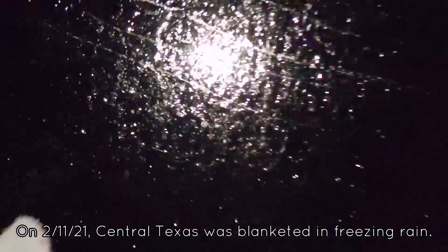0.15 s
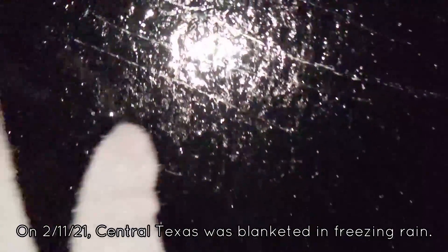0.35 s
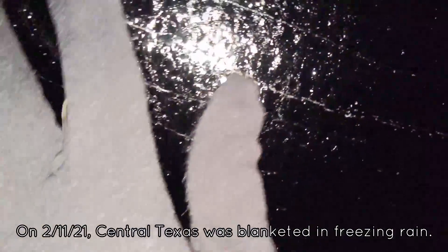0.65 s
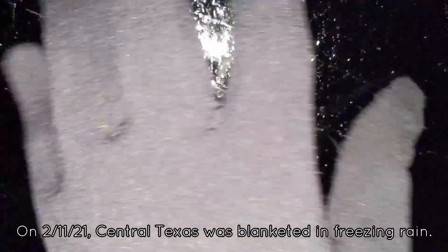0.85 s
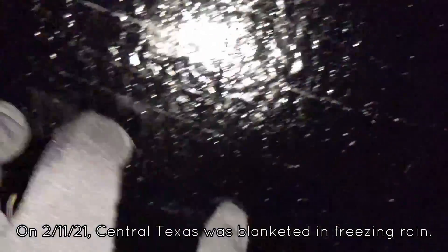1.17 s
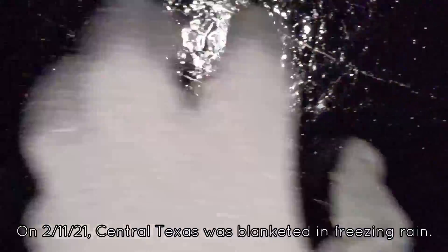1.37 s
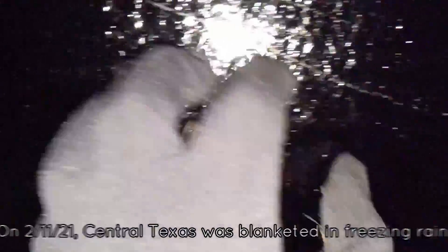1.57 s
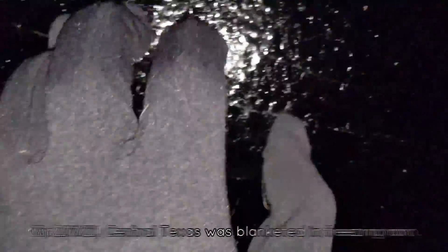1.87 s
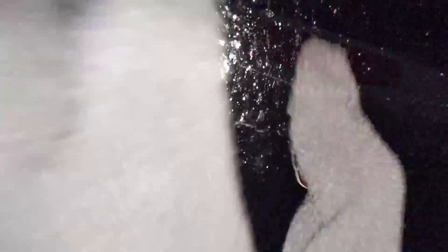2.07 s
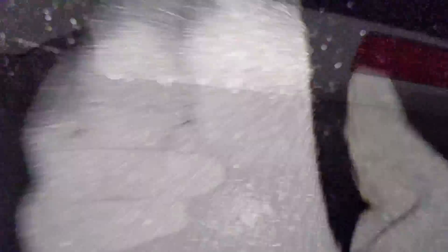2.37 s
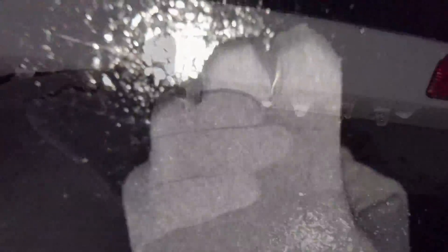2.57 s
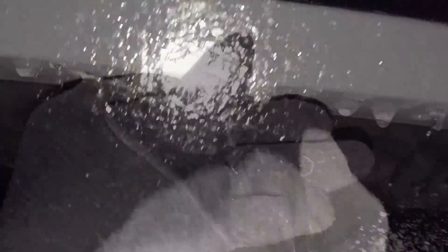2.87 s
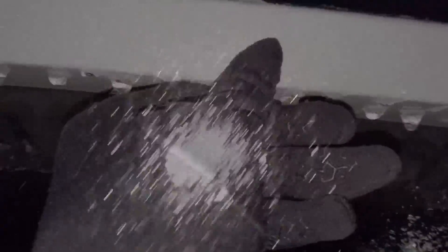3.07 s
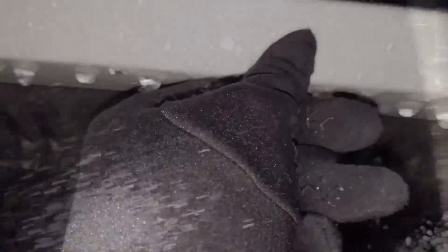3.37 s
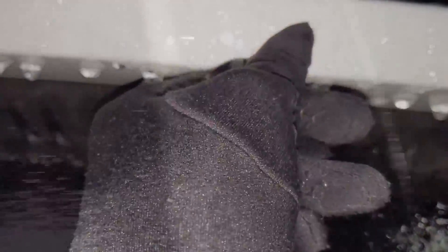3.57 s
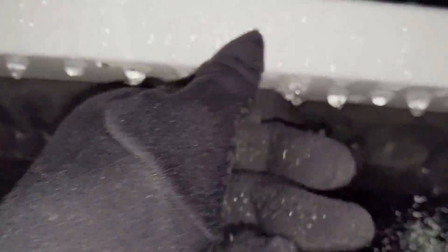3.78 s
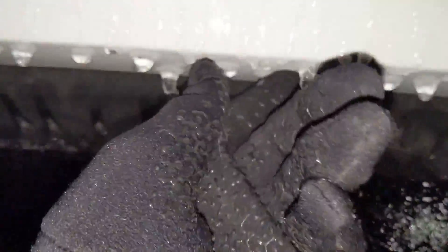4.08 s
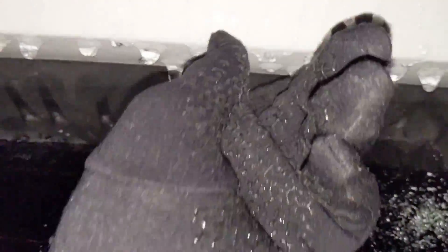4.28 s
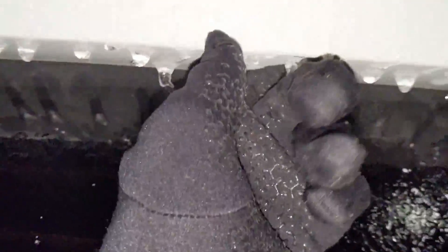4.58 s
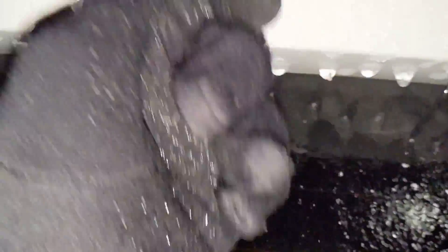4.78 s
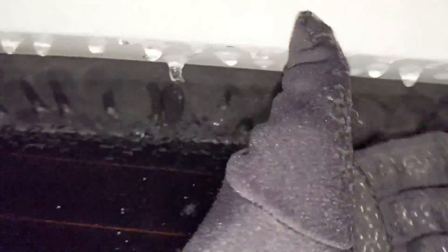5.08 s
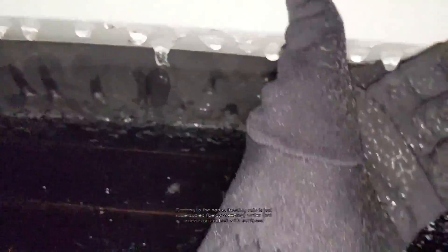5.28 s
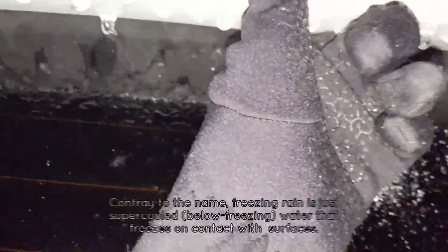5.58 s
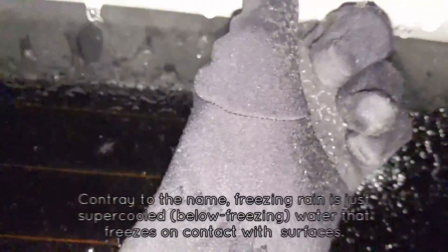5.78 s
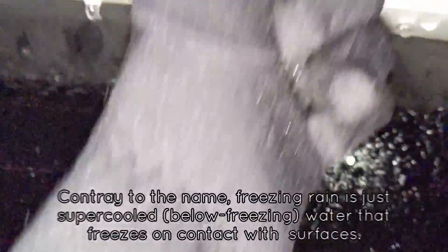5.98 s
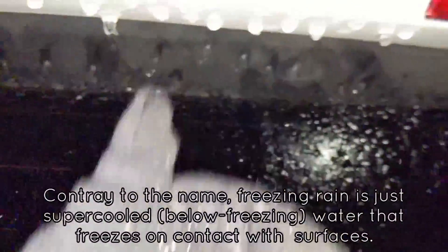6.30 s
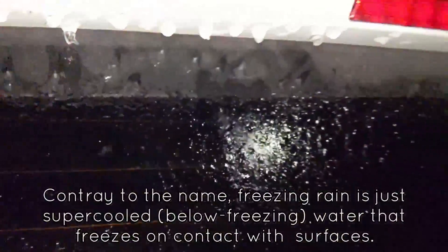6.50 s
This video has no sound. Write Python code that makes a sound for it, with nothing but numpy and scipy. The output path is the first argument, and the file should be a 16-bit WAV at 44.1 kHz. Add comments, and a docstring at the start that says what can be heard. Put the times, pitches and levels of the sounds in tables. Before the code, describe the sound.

Outdoors at night, close to a phone. Sleeve cloth rustles and the grip bumps softly, then a gloved hand slaps an icy car panel three times, each weaker, with a short hollow body ring. After a pause, icicles crack off the trim: two hard snaps a little over a second apart, smaller clicks around them, then a snap with a low thump. Ice crumbs tick, keys tinkle faintly, and distant traffic rumbles very quietly.

```python
"""Outdoors at night, close to a phone: a gloved hand slaps an ice-glazed car panel three times.
It then snaps small icicles off a trim edge. Slaps are short pushes of air that also ring the panel;
snaps are bursts of spiky noise, a pitched clack with bright splinters. The hand also thuds on the trim.
Ice crumbs tick and keys tinkle. Shaped noise makes the sleeve rustle, the soft bumps of the grip and
the rumble of distant traffic; a sine makes a faint hum."""
import sys
import numpy as np
from scipy import signal
from scipy.fft import rfft, irfft, next_fast_len
from scipy.io import wavfile
from scipy.ndimage import uniform_filter1d, map_coordinates

SR = 44100
rng = np.random.default_rng(int(sys.argv[2]) if len(sys.argv) > 2 else 0)


def log_audio(samples):
    """Write samples as a 16-bit WAV file to the path given in sys.argv[1]."""
    # one column per channel
    frames = np.atleast_2d(samples).T
    # limit to full scale, then quantise
    limited = np.clip(frames, -1, 1)
    pcm = np.round(limited * 32767).astype(np.int16)
    wavfile.write(sys.argv[1], SR, pcm)


N = 293000  # length in samples


def hand_blows():
    """A soft touch is a bell-shaped force: it pushes air once and rings the body, duller if it lasts longer."""
    out, lead = np.zeros((2, N)), 0.03  # lead: seconds kept before the middle of a touch
    t = np.arange(round(3 * lead * SR)) / SR - lead
    lean = amp([[-0.7], [0.7]])  # a little louder on the right
    for s, push_db, ms, ring_db, scuff_db, modes in slap_touches() + thud_touches():
        force = np.exp(-2 * (t * 1000 / ms) ** 2)
        ringing = ring(modes, scatter_db=1, attack=0.001)
        body = amp(ring_db) * signal.fftconvolve(ringing, force / force.sum())
        # air moves with the panel's speed: away, then back
        speed = -np.gradient(force)
        push = amp(push_db) * speed / speed.max()
        # the glove slides on after landing
        rub = filtered(rng.standard_normal((2, len(t))), scuff_tone)
        scuff = rub * np.exp(-(t / np.where(t < 0, 0.009, 0.028)) ** 2)
        # the glove lets little treble into the shell
        padded = filtered(push, lambda f: 1 / (1 + 1j * f / 500))
        add(out, s - lead, body * lean)
        add(out, s - lead, push * lean + amp(scuff_db) * scuff / np.abs(scuff).max())
        add(out, s - lead, amp(-4.5) * signal.fftconvolve(padded[None], shell(), axes=1))
    return filtered(out, lambda f: 1j * f / (95 + 1j * f))  # a small panel radiates deep bass poorly


def scuff_tone(f):
    """A sliding glove is strongest in the middle tones, weaker in the bass and the treble."""
    return f / (f + 400) * (0.013 + 1 / (1 + (f / 900) ** 1.8))


# parts of the hand: (push [dB re slap], contact time [ms], ring [dB re slap], scuff [dB re slap's scuff])
BRUSH, TIP, PALM, FINGERS = (-17, 1, -24.5, -1.5), (-8.5, 0.63, -20, -18), (-1, 2.5, -8, -4), (2, 0.67, -6.5, 0)
BRUSH_LEADS_S, TIP_LEADS_S = 0.005, 0.00049  # seconds before the palm
# slaps on the panel: (palm lands [s], push before the bass cut [dB], fingers follow after [s], scuff [dB])
SLAP_TIMES = [(1.9748, -9.5, 0.005, -40.5), (2.2516, -13, 0.0054, -40.5), (2.5374, -21, .0124, -36)]
# tones of the glazed panel: (pitch [Hz], level [dB], time to fall 60 dB [s])
PANEL_TONES = [(100.8, 2, 0.21), (130.1, -12, 0.49), (162.8, -7, 0.095), (236.6, -14, 0.25),
               (395, -19.5, 0.27), (423, -33, 0.21), (550, -15.5, 0.23), (750, -27, 0.11), (851, -43, 0.26),
               (900, -35, 0.21), (1058, 22.5, 0.012)]


def slap_touches():
    """A slap is four touches: a brush and a fingertip just before the palm, then the fingers."""
    touches = []
    for s, db, follow, scuff_db in SLAP_TIMES:
        parts = [(-BRUSH_LEADS_S, BRUSH), (-TIP_LEADS_S, TIP), (0, PALM), (follow, FINGERS)]
        for wait, (push, ms, ring_db, scuff) in parts:
            touches.append((s + wait, db + push, ms, db + ring_db, scuff_db + scuff, PANEL_TONES))
    return touches


THUD_S, THUD_DB, THUD_MS, THUD_RING_DB = 5.9572, -9, 2.1, -11  # time, push, contact time, ring against push
SECOND_PUSH_S, SECOND_PUSH_DB = 0.00498, -6.5  # delay after the first push and level against it
# tones of the trim edge: (pitch [Hz], level [dB], time to fall 60 dB [s])
TRIM_TONES = [(189.2, -2, 0.18), (243.6, 0, 0.14), (315, -2.5, 0.13), (384.5, -1, 0.15), (467, -12.5, 0.24),
              (620, -7, 0.086), (841, -11.5, 0.14), (965, -7.5, 0.11), (1038, 0.5, 0.077),
              (1460, -20, 0.072), (1600, -21, 0.14), (1827, -11.5, 0.087), (2950, -31.5, 0.25),
              (3811, -22.5, 0.088)]


def thud_touches():
    """The heel of the hand hits the trim: a short low thump near 200 Hz made of two pushes, the second weaker."""
    pushes = [(THUD_S, THUD_DB), (THUD_S + SECOND_PUSH_S, THUD_DB + SECOND_PUSH_DB)]
    return [(s, db, THUD_MS, db + THUD_RING_DB, -np.inf, TRIM_TONES) for s, db in pushes]  # no scuff


SNAP_WIDTH_HZ = 1800  # width of the clack
SNAP_T60_S, T60_PER_DB_S = 0.026, 0.0002  # decay of the loudest snap, shorter for each dB less
# icicles break off: (time [s], clack [dB], pitch [Hz], splinters [dB], knock into the trim [dB],
# left minus right [dB])
ICICLE_SNAPS = [(3.5398, -14, 1050, -20.5, -31, 0.5), (3.989, -30.5, 1400, -44, -82, 0),
                (4.058, -40, 2210, -51, -65, 0), (4.121, -48, 1550, -38, -63, -3.5),
                (4.278, -31, 2320, -23.5, -62.5, -1.5), (4.451, -45, 1900, -40, -54, -7),
                (4.721, -56.5, 1750, -51.5, -75, -2), (4.7538, -11.5, 1100, -23, -25, -1.5),
                (5.49, -33.5, 1850, -39, -53.5, -6), (5.502, -32, 1650, -37, -53, -6),
                (5.607, -30, 1340, -28.5, -41.5, -5), (5.94, -16.5, 850, -21, -28, -2),
                (6.269, -46, 1950, -49.5, -50.5, -11.5), (6.275, -48, 1550, -48, -83, -7)]


def icicle_snaps():
    """A breaking icicle cracks and knocks the trim, which rings in its own tones."""
    out = np.zeros((2, N))
    loudest_db = np.max(ICICLE_SNAPS, 0)[1]
    for s, db, hz, splinter_db, knock_db, pan in ICICLE_SNAPS:
        t60 = SNAP_T60_S - T60_PER_DB_S * (loudest_db - db)
        snap = crack(db, hz, SNAP_WIDTH_HZ / hz, splinter_db, t60, pan,
                     rise=0.0009, first=0.57, shell_db=-4.5)
        add(out, s, snap)
        knock = ring(TRIM_TONES, scatter_db=1.5, attack=0.003)
        # loud at first, then quickly damped by the glove still resting on the trim
        knock = knock * (1 + 1.45 * amp(-60 * np.arange(len(knock)) / SR / 0.099))
        add(out, s, amp(knock_db) * knock * amp([[-1.2], [1.2]]))
    return out


TICK_WIDTH_HZ, TICK_T60_S = 760, 0.0093  # width of the clack, time to fall 60 dB
# small ticks on the glaze: (time [s], clack [dB], pitch [Hz], splinters [dB], left minus right [dB])
CRUMB_TICKS = [(0.004, -34.5, 1290, -54.5, -4.5), (0.047, -44.5, 1760, -69, -9),
               (0.171, -48, 1770, -71, -4), (0.443, -46, 490, -70, -3), (0.848, -43, 1230, -44.5, -5),
               (1.75, -54, 3200, -56, -5), (1.774, -53, 1290, -74, -13), (1.837, -26.5, 2500, -37, -11.5),
               (1.8369, -32, 750, -70, -2.5), (2.103, -67, 600, -60, -23), (3.851, -34, 1520, -78, 3),
               (3.918, -32, 1160, -47, -1), (4.048, -53, 3880, -43, -4), (4.181, -52, 1210, -67, -2),
               (4.329, -41, 915, -65, -1), (4.593, -40, 840, -74, 3), (4.603, -47, 1390, -75, -10),
               (4.611, -38.5, 574, -76, -5), (4.62, -46, 1160, -76, 2), (4.639, -40.5, 840, -53, -2),
               (4.654, -62.5, 876, -48, -10), (4.851, -41.5, 950, -48, 7), (5.365, -50, 608, -67, 1),
               (5.445, -56, 659, -53, 2), (5.647, -54, 744, -48, -13), (5.683, -60, 1480, -62, -7),
               (5.696, -36, 1400, -36, -1.5), (5.718, -70, 1370, -51, 1), (5.77, -53.5, 1490, -52, -3),
               (5.917, -69.5, 2000, -53, 4.5), (6.033, -49.5, 680, -49.5, -2),
               (6.069, -47.5, 1860, -46.5, -12), (6.303, -42, 1460, -69, 3), (6.362, -34, 1750, -54, 7),
               (6.371, -45.5, 790, -51.5, -2), (6.538, -60, 888, -51.5, 3)]


def crumb_ticks():
    """Glove and ice crumbs tick on the glaze: short cracks with no knock into the trim."""
    out = np.zeros((2, N))
    for s, db, hz, splinter_db, pan in CRUMB_TICKS:
        tick = crack(db, hz, TICK_WIDTH_HZ / hz, splinter_db, TICK_T60_S, pan,
                     rise=0.00045, first=1.47, shell_db=-7.5)
        add(out, s, tick)
    return out


# colour of the splinters: (frequency [Hz], relative level [dB])
SPLINTER_COLOUR = [(880, -54), (1500, -0.5), (2500, -3), (4800, -4.5), (6170, -4.5), (8010, -8), (9690, -3),
                   (14800, -11.5), (15700, -32.5), (16500, -52)]
# level of a crack, left minus right: (frequency [Hz], difference [dB])
LEFT_LOUDER = [(60, 1), (110, -6.5), (200, 17.5), (380, 15), (700, -3.5), (1290, -5.5), (2380, -6),
               (4400, 12), (8120, 5.5), (15000, -3)]
# how far the left side of a crack leads: (frequency [Hz], phase [radians])
LEFT_LEADS = [(200, 4.1), (500, 0.252), (1000, 0.75), (2000, 1.35), (4000, 2.04), (16000, 1.82)]


def crack(db, hz, breadth, treble_db, t60, pan, rise, first, shell_db):
    """One sharp failure and a burst of micro-cracks: a clack and splinters, with the shell's answer."""
    t = np.arange(SR // 8) / SR
    sides = np.array([[1], [-1]])
    swell = amp(-60 * t / np.clip(t60, 0.002, 0.1)) * (1 - np.exp(-t / rise))
    spiky = rng.standard_normal((3, len(t))) * amp(2 * rng.standard_normal(len(t))) * swell
    spiky[:2, swell.argmax()] = -first * np.linalg.norm(swell)  # the sharp failure
    clack = filtered(spiky[0], lambda f: band(hz, breadth * hz)(f) * band(hz, 2.5 * breadth * hz)(f))
    bright = filtered(spiky[1] + 0.5 * spiky[2] * sides, lambda f: amp(along(SPLINTER_COLOUR, f)))
    burst = (amp(db) * unit(clack) + amp(treble_db) * unit(bright)) / unit(swell).max()

    def left_right(f):
        """Half of each level and phase difference goes to the left, the opposite half to the right."""
        return (amp(along(LEFT_LOUDER, f) / 2) * np.exp(0.5j * along(LEFT_LEADS, f))) ** sides

    burst = filtered(burst, left_right) * amp([[pan / 2], [-pan / 2]])
    answer = signal.fftconvolve(burst, shell(), axes=1)[:, :len(t) + SR // 4]
    return np.pad(burst, ((0, 0), (0, SR // 4))) + amp(shell_db) * answer


# touches of the keys: (time [s], level before the ringing filter [dB])
KEY_TOUCHES = [(2.8907, -46.5), (2.947, -52), (5.0499, -37.5), (5.0624, -40), (5.0823, -30), (5.094, -38),
               (5.1094, -44), (6.585, -44), (6.589, -37)]
# tones of the keys: (pitch [Hz], width [Hz], level [dB])
KEY_TONES = [(6190, 250, -8), (9100, 300, -13), (10400, 200, -5), (11930, 300, -3.5), (13100, 300, -12),
             (14500, 200, -2)]


def keys():
    """Small metal pieces chatter against each other and ring high: gritty noise through narrow bands."""
    chatter, t = np.zeros((2, N)), np.arange(SR // 10) / SR
    for s, db in KEY_TOUCHES:
        grit = rng.standard_normal((2, len(t))) * amp(1.8 * rng.standard_normal(len(t)))
        add(chatter, s, amp(db - 60 * t / 0.15) * (1 - np.exp(-t / 0.0015)) * grit)
    return filtered(chatter, lambda f: sum(amp(db) * band(hz, width)(f) for hz, width, db in KEY_TONES))


FLUTTER_DB, FLUTTER_PER_S = 1.5, 14  # size and speed of the random flutter
HISS_DB, HISS_GROWS = -4, 1.01  # the hiss against the rustle's body; it swings a little wider
# sleeve rustle: (time [s], level [dB])
SLEEVE_LEVEL = [(0.06, -63), (0.29, -58), (0.376, -51), (0.5, -61), (0.62, -66), (1.0, -62), (1.228, -55),
                (1.298, -60.5), (1.4, -54), (1.58, -57), (1.62, -65.5), (1.665, -57), (1.76, -67),
                (1.87, -61), (1.94, -70), (2.4, -72.5), (2.7, -70.5), (3.05, -67.5), (3.22, -64.5),
                (3.61, -71), (3.82, -70), (3.88, -59), (4.25, -66.5), (4.38, -63), (4.7, -70),
                (4.93, -63.5), (5.02, -68), (5.3, -62.5), (5.78, -74), (6.11, -65.5), (6.36, -63),
                (6.64, -65.5)]
# colour of the rustle's body: (frequency [Hz], relative level [dB])
CLOTH_COLOUR = [(240, -40.5), (400, -19.5), (467, -10.5), (566, -14), (785, -5), (1170, -1.5), (1660, 1.5),
                (2830, -7), (4000, -9), (5200, -40), (8800, -120)]
# colour of the rustle's hiss: (frequency [Hz], relative level [dB])
HISS_COLOUR = [(1470, -22.5), (2500, -11.5), (3320, -3.5), (4560, 6), (6150, 2.5), (7030, -2), (10600, 2),
               (15000, -2.5), (16100, -12), (16500, -35)]


def sleeve_rustle():
    """Rubbing cloth is noise in two ranges, a body and a hiss, that flutter together at random."""
    t = np.arange(N) / SR
    wobble = rng.standard_normal(round(t[-1] * FLUTTER_PER_S) + 4)
    flutter = map_coordinates(wobble, [t * FLUTTER_PER_S])  # smooth curve through the random points
    cloth_db = level_curve(SLEEVE_LEVEL) + FLUTTER_DB * flutter
    hiss_db = HISS_DB + cloth_db.mean() + HISS_GROWS * (cloth_db - cloth_db.mean())
    body = amp(cloth_db) * rush(CLOTH_COLOUR, patchy_db=1.4)
    hiss = amp(hiss_db) * rush(HISS_COLOUR, patchy_db=0.4)
    return (body + hiss) * amp([[-0.6], [0.6]])


BUMP_RISE_S, BUMP_FALL_S = 0.033, 0.045
# the grip on the phone shifts: (time [s], peak level [dB])
GRIP_SHIFTS = [(1.212, -38.5), (1.3, -46.5), (1.517, -39.5), (1.573, -45.5), (1.65, -50)]
# colour of the bumps: (frequency [Hz], relative level [dB])
BUMP_COLOUR = [(18, -45.5), (30, -25.5), (76, 0), (114, -0.5), (231, -14), (338, -27.5), (446, -24),
               (779, -27.5), (1000, -27), (1300, -39), (2200, -120)]


def grip_bumps():
    """The grip shifts in soft bumps: low noise that swells and fades along a bell shape."""
    t = np.arange(N) / SR
    swell = np.zeros(N)
    for s, db in GRIP_SHIFTS:
        swell += amp(db) * np.exp(-((t - s) / np.where(t < s, BUMP_RISE_S, BUMP_FALL_S)) ** 2)
    return swell * rush(BUMP_COLOUR, patchy_db=3.0)


# traffic rumble: (time [s], level [dB])
TRAFFIC_LEVEL = [(0.0, -58), (1.4, -55.5), (2.4, -54.5), (2.85, -60.5), (3.4, -56), (4.2, -56.5),
                 (6.64, -57.5)]
# colour of the rumble: (frequency [Hz], relative level [dB])
RUMBLE_COLOUR = [(12, -33), (20, -9.5), (80, -3), (102, -5.5), (119, -11), (295, -20.5), (406, -26.5),
                 (440, -26.5), (900, -31.5), (1170, -47.5), (1980, -120)]


def distant_traffic():
    """Far traffic is low noise whose level drifts slowly."""
    return amp(level_curve(TRAFFIC_LEVEL)) * rush(RUMBLE_COLOUR, patchy_db=0.5)


HUM_HZ, HUM_DB, HUM_FADES_S, HUM_FADE_DB_PER_S = 161, -59, 0.45, 24.5  # pitch, level, fade start, fade speed


def faint_hum():
    """A single steady tone that holds, then fades."""
    t = np.arange(N) / SR
    level_db = HUM_DB - HUM_FADE_DB_PER_S * np.maximum(t - HUM_FADES_S, 0)
    return amp(level_db) * np.sin(2 * np.pi * HUM_HZ * t)


def ring(modes, scatter_db, attack):
    """All tones of a struck object, at new strengths for every blow; each dies at its own speed."""
    t = np.arange(SR // 3) / SR
    hz, db, t60 = np.transpose(modes)[..., None]
    level = db + scatter_db * rng.standard_normal(db.shape) - 60 * t / t60
    tones = amp(level) * np.sin(2 * np.pi * hz * t)
    return tones.sum(0) * (1 - np.exp(-t / attack))


# dense ringing of the body shell: (frequency [Hz], time to fall 60 dB [s])
SHELL_DECAY = [(150, 0.2), (600, 0.11), (1500, 0.078), (5000, 0.094), (15000, 0.13)]
# what the shell passes on: (frequency [Hz], level [dB])
SHELL_COLOUR = [(40, -25), (100, -11), (200, -1), (1000, 1), (3000, -10.5), (8000, -18), (16000, -21)]


def shell():
    """The car body's dense ringing: a new stereo noise tail in which each frequency dies at its own speed."""
    hz, t, z = signal.stft(rng.standard_normal((2, SR // 3)), SR, nperseg=256)
    fade = amp(-60 * t / along(SHELL_DECAY, hz)[:, None])
    mid, side = signal.istft(z * fade, SR, nperseg=256)[1]
    side = filtered(side, lambda f: 1.0 * f / (f + 600))  # the bass is shared by both ports
    pair = np.array([mid + side, mid - side]) / np.linalg.norm(mid)
    return filtered(pair, lambda f: amp(along(SHELL_COLOUR, f)))


# how alike left and right are in the noises: (frequency [Hz], likeness from -1 to 1)
LEFT_RIGHT_LIKENESS = [(25, 0.95), (80, 0.99), (180, 0.95), (550, 0.54), (1650, -0.0089), (4970, -0.056),
                       (15000, 0.035)]


def rush(spectrum, patchy_db):
    """Stereo noise with patches of random gain in time and pitch; its rms is the square root of 2."""
    z = signal.stft(rng.standard_normal((2, N)), nperseg=512)[2]
    field = rng.standard_normal(z.shape[1:])
    field = uniform_filter1d(uniform_filter1d(field, 6, 0), 8, 1)
    pair = signal.istft(z * amp(patchy_db * unit(field)), nperseg=512)[1][:, :N]

    def colour(hz):
        """Share the noise between middle and side so that left and right are as alike as listed."""
        turn = np.arccos(np.clip(along(LEFT_RIGHT_LIKENESS, hz), -1, 1)) / 2
        return amp(along(spectrum, hz)) * [np.cos(turn), np.sin(turn)]

    mid, side = filtered(pair, colour)
    return unit(np.array([mid + side, mid - side])) * np.sqrt(2)


def band(hz, width):
    """Response of one resonance: strongest at its own pitch."""
    return lambda f: 1j * f * width / (hz * hz - f * f + 1j * f * width)


def filtered(x, response):
    """Reshape the tone of x with a gain (and phase) for each frequency."""
    m = next_fast_len(x.shape[-1] + 4096)
    return irfft(rfft(x, m) * response(np.fft.rfftfreq(m, 1 / SR)), m)[..., :x.shape[-1]]


def along(points, hz):
    """Read a list of (Hz, value) points on a log frequency axis."""
    f, v = np.transpose(points)
    return np.interp(np.log(hz + 1), np.log(f + 1), v)


def level_curve(rows):
    """Join (time, level) points with straight lines, one value per sample."""
    s, db = np.transpose(rows)
    return np.interp(np.arange(N) / SR, s, db)


def add(track, s, sound):
    """Mix a sound into the track at a time in seconds."""
    part = track[..., round(s * SR):][..., :sound.shape[-1]]
    part += sound[..., :part.shape[-1]]


def amp(db):
    """Gain of a dB value."""
    return 10 ** (np.asarray(db) / 20)


def unit(x):
    """Scaled to rms 1."""
    return x / np.sqrt(np.mean(x ** 2) + 1e-20)


def scene():
    """Everything that reaches the phone's two ports."""
    ice = hand_blows() + icicle_snaps() + crumb_ticks()
    return ice + keys() + sleeve_rustle() + grip_bumps() + distant_traffic() + faint_hum()


TOP_HZ = 16300  # band limit


def record(dry):
    """The phone rounds off the highest peaks and cuts steeply above its band limit."""
    soft = dry / (1 + np.abs(dry / 0.65) ** 4) ** (1 / 4)
    return filtered(soft, lambda hz: 1 / (1 + (hz / TOP_HZ) ** 120))


dry = scene()
out = record(dry)
log_audio(out)
```